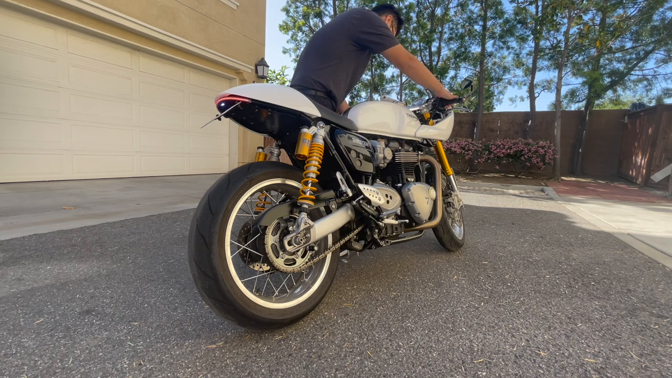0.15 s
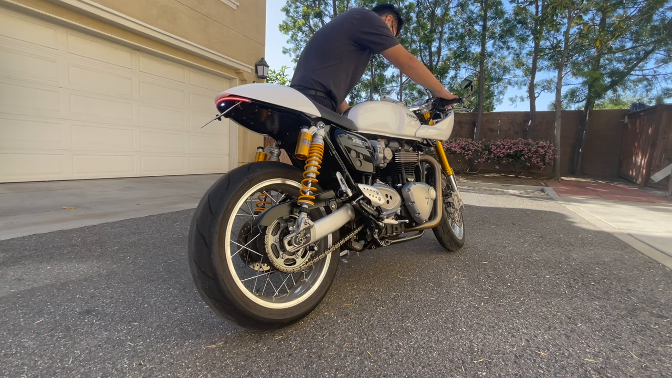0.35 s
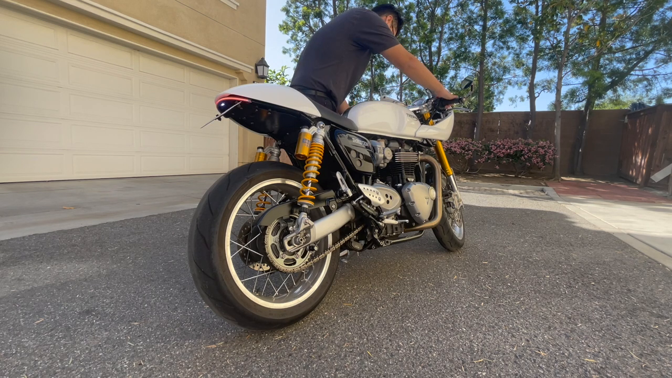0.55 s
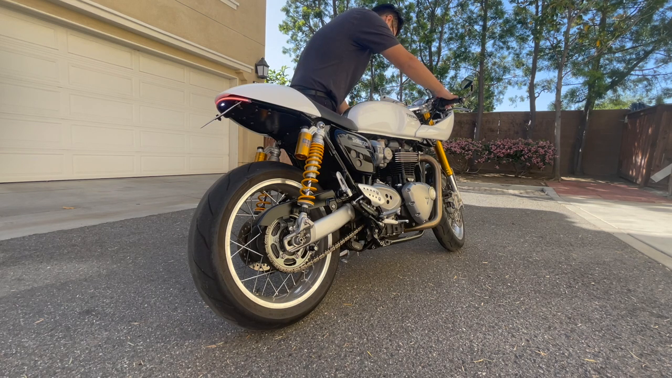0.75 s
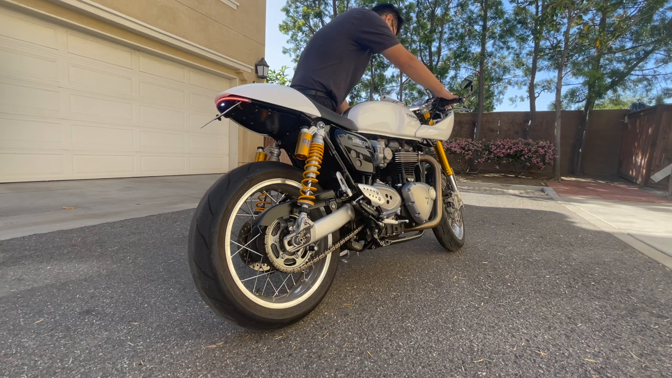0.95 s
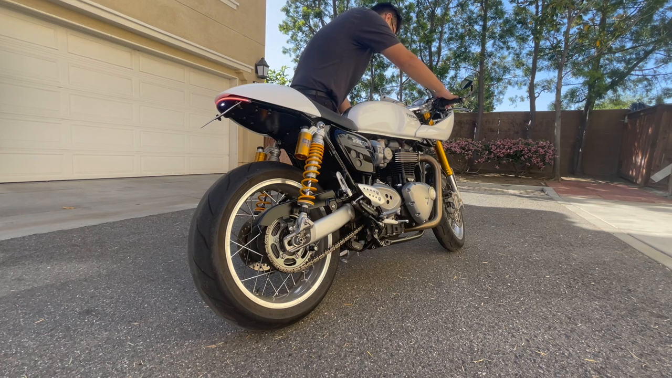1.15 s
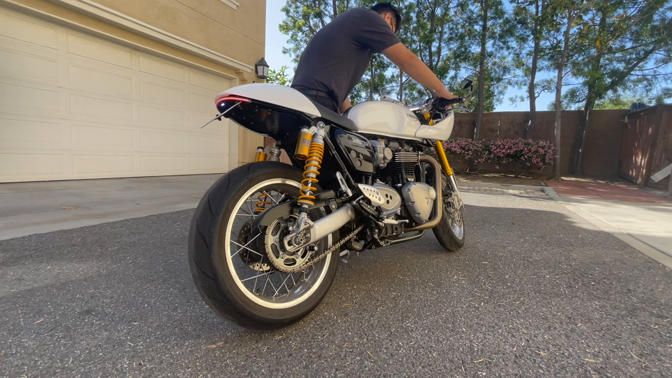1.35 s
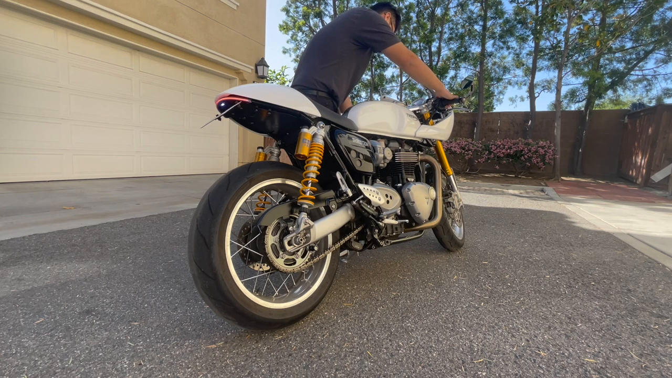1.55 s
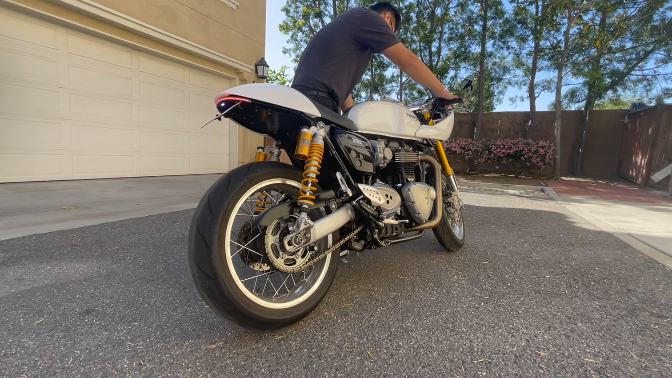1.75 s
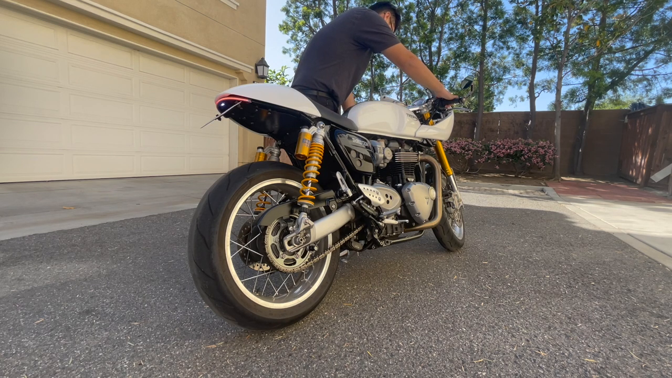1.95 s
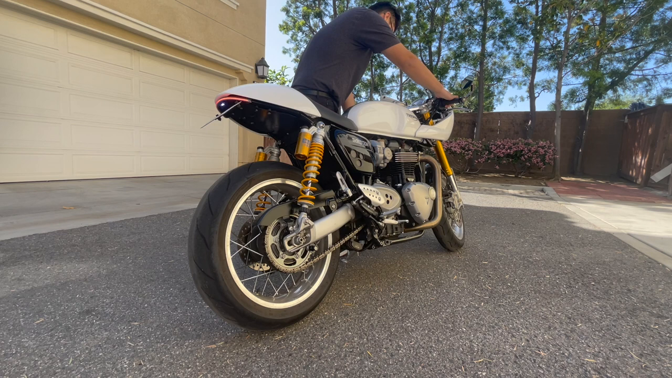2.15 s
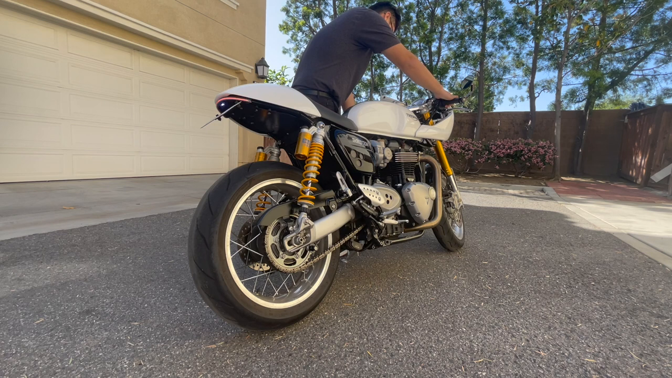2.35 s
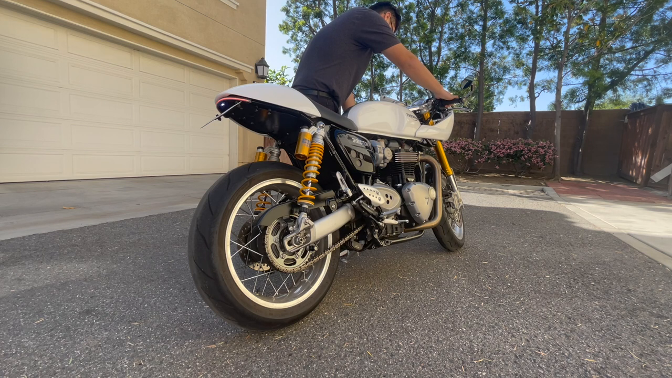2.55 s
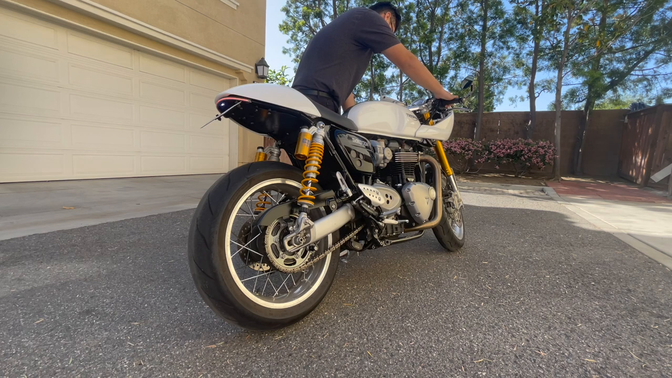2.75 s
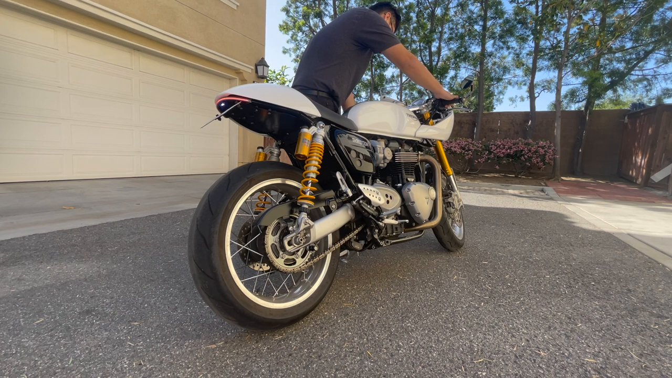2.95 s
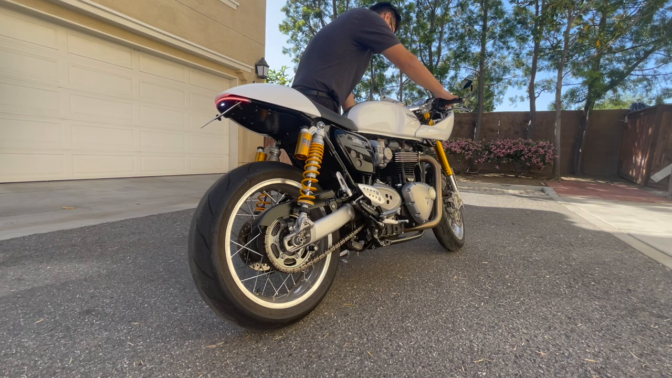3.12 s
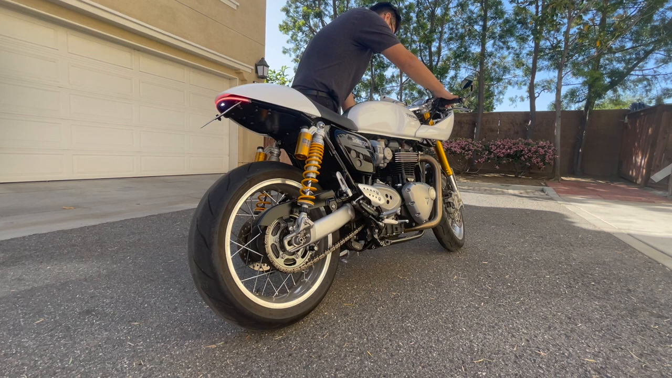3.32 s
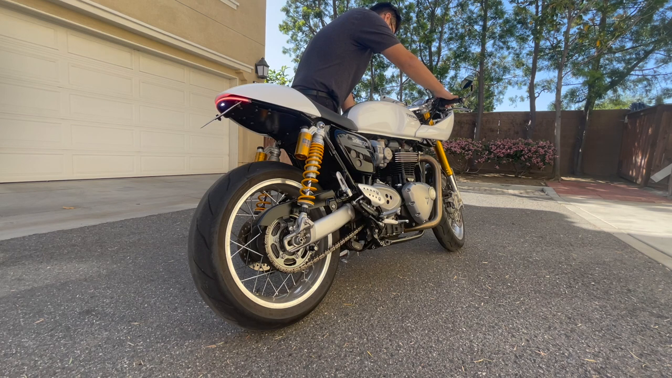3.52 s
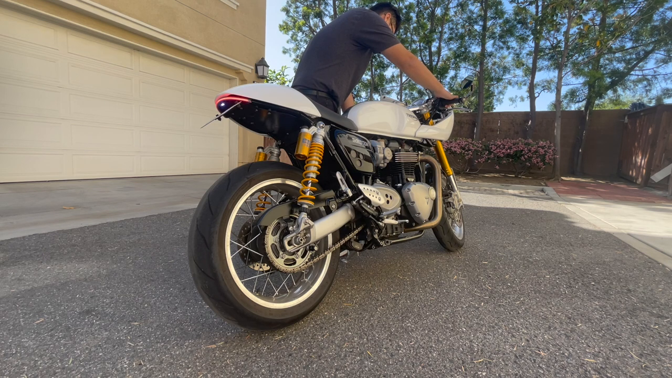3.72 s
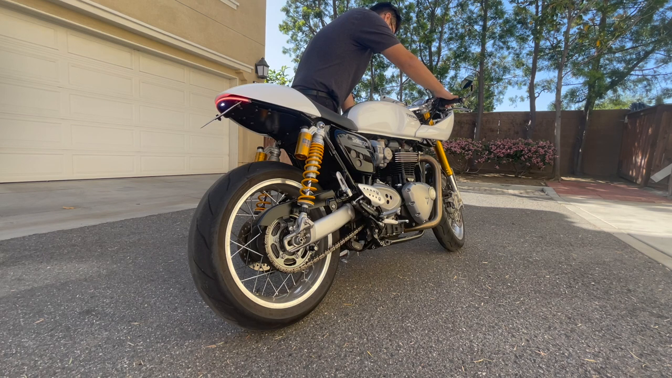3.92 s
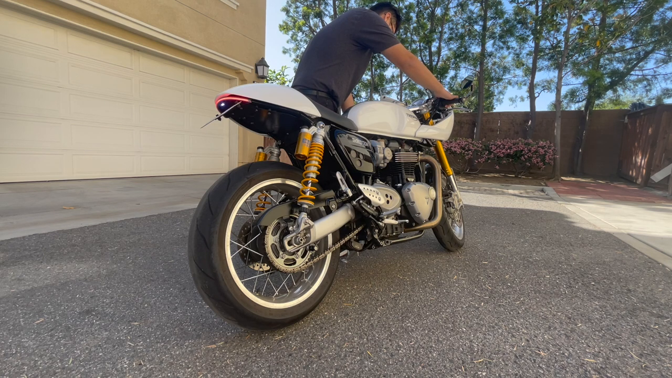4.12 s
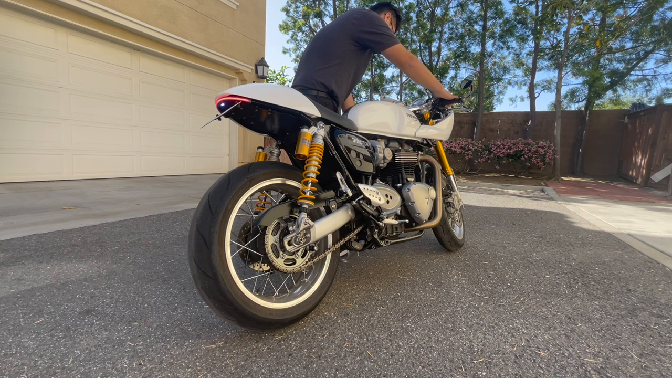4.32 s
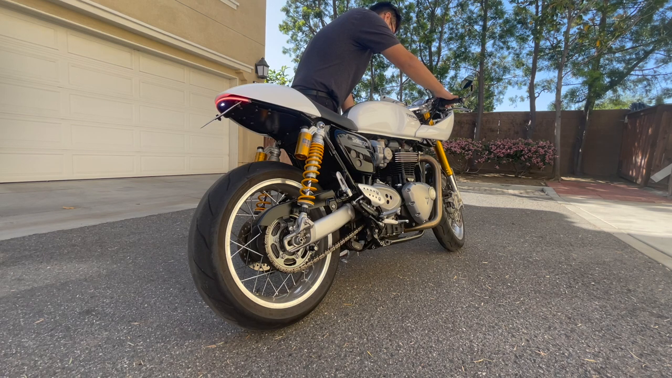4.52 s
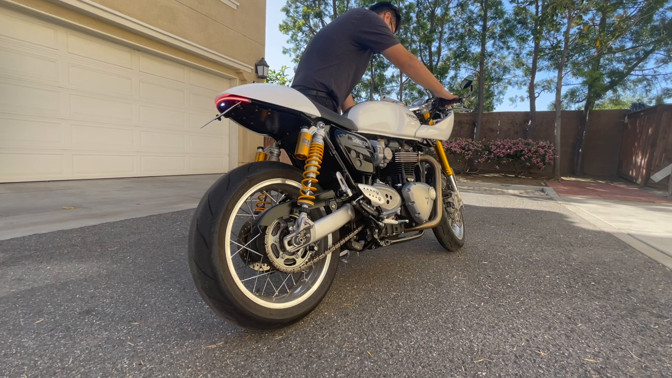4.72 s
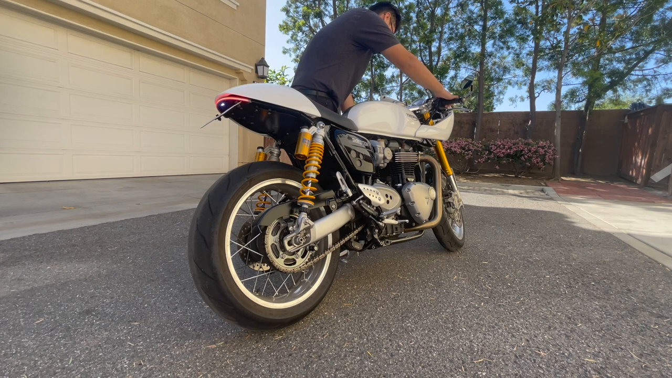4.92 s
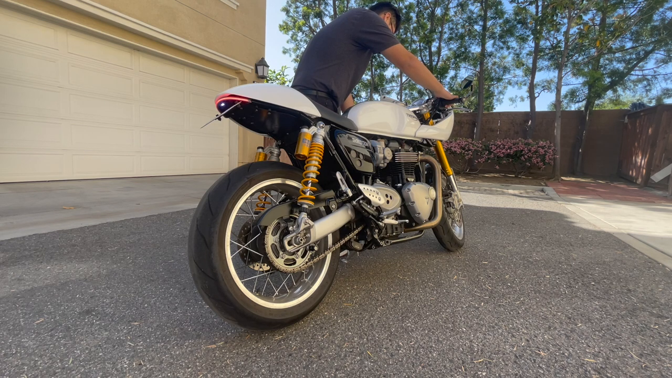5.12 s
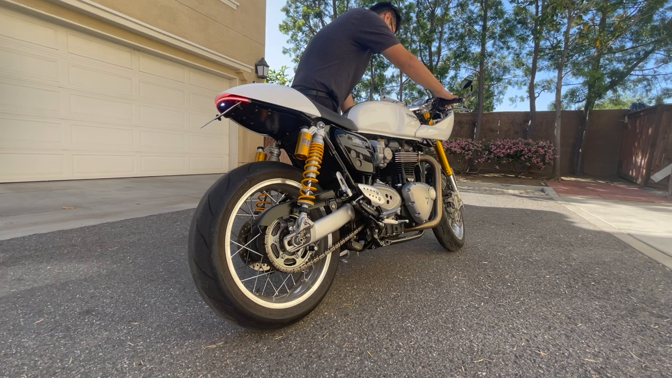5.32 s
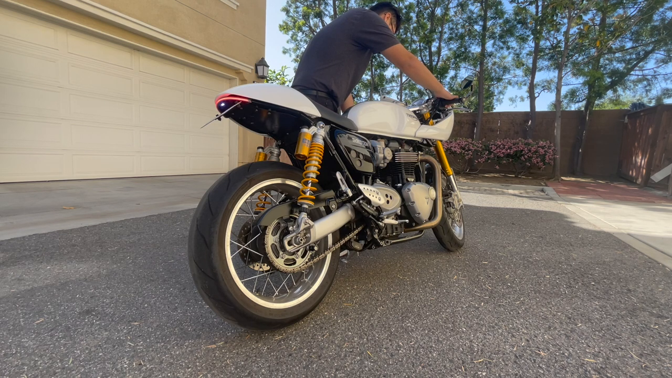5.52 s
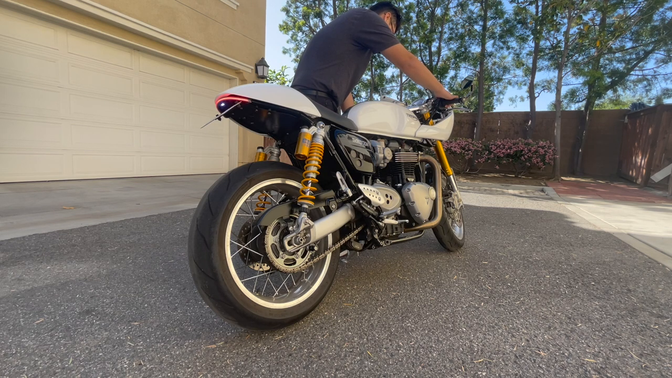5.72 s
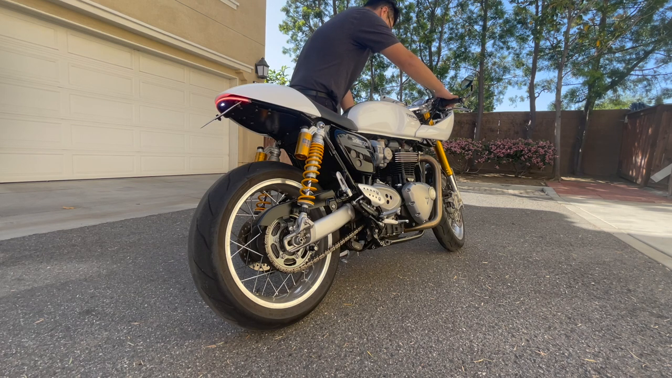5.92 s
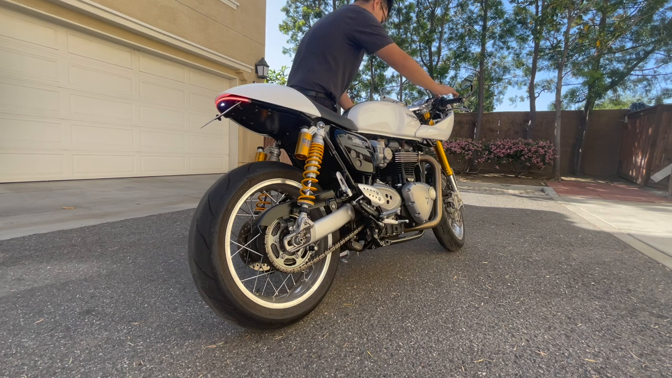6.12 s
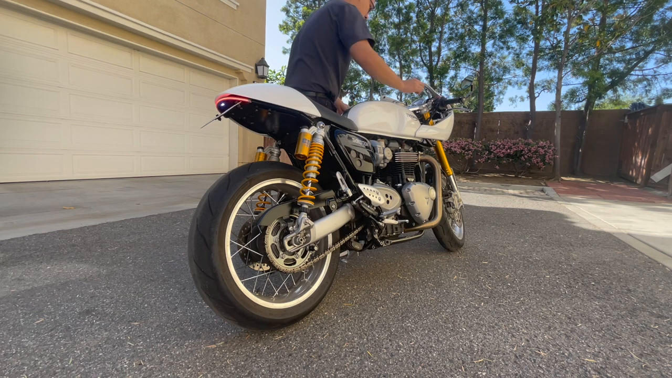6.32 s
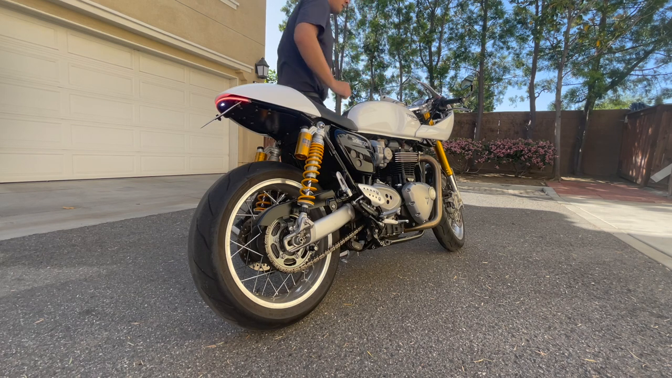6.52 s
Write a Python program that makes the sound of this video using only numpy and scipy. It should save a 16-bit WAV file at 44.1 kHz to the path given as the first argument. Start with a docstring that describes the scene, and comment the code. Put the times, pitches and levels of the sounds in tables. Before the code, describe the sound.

Outdoors in a driveway, soft distant traffic rumble and small bird chirps. A faint switch click, then a hard metallic clack and under a second of lurching, gritty starter whine with soft exhaust puffs. The twin engine catches with a thump and knocks, runs loud and rattly with small bright pings, then eases into a lumpy low idle with valve ticks. Close stereo microphone behind the bike, dull wall reflections.

```python
"""A twin-cylinder motorcycle starts beside a garage wall, with far traffic throughout.
First bird whistles over shaped noise and a switch clack; then the pinion clacks in and the starter's
gear-mesh tone and grind lurch up and sag under each compression, with soft pipe puffs.
The engine catches with a thump, pings and flares a little: firing pulses ring pipe modes, noise clatters.
It settles to an uneven-beat idle with weak firings and afterfires."""
import sys
import numpy as np
from scipy import signal
from scipy.fft import rfft, irfft
from scipy.io import wavfile

SR = 44100
rng = np.random.default_rng(int(sys.argv[2]) if len(sys.argv) > 2 else 0)


def unload_audio(sound):
    """Save the sound as a 16-bit wav file, at the path given as the first command line argument."""
    columns = np.transpose(np.atleast_2d(sound))
    # keep every value between -1 and 1, then stretch to whole-number steps
    steps = np.round(np.clip(columns, -1, 1) * 32767)
    wavfile.write(sys.argv[1], SR, steps.astype(np.int16))


N = 289737

IDLE_FROM_S = 4.0   # rms of the rasp, the ticks and the whine's speed surge is taken from here on
SECOND_CYLINDER = 0.37   # share of the two-turn cycle after the first cylinder

# Crank speed from the first firing on. Each row: time in seconds, speed in rpm.
CRANK = [(2.92, 1445.3), (3.05, 1231.3), (3.2, 1435.3), (3.5, 1470.2), (3.75, 1610.8), (4.0, 1494.3),
         (4.25, 1348.7), (4.5, 1320.7), (4.75, 1280.6), (5.0, 1221.6), (5.25, 1254.0), (5.45, 1227.6),
         (5.65, 1303.9), (5.9, 1372.1), (6.2, 1378.5), (6.57, 1368.9)]


def cycle_times(share):
    """Moments in seconds at which the crank passes a given share of each two-turn cycle."""
    t = np.arange(N) / SR
    rpm = in_time(CRANK)[0] * (t >= CRANK[0][0])
    cycles = np.cumsum(rpm) / (120 * SR)
    wanted = np.arange(share + 1e-3, cycles[-1])
    return np.interp(wanted, cycles, t)


def firing_times():
    """Nominal firing moments of both cylinders, first cylinder's block first."""
    return np.r_[cycle_times(0), cycle_times(SECOND_CYLINDER)]


# Exhaust modes. Each row: frequency in Hz, t60 in seconds, signed strength from cylinder 1, from cylinder 2.
PIPE_MODES = [(54.1, 0.55, 0.096, 0.091), (83.2, 0.2, -0.122, -0.11), (112.2, 0.21, 0.16, -0.1),
              (179.4, 0.074, 0.3, 0.49), (210.1, 0.41, -0.036, -0.14), (270.6, 0.026, -1.164, -0.31),
              (285.3, 0.21, 0.21, -0.18), (350.9, 0.096, 0.19, -0.071), (424, 0.033, 0.052, -0.057),
              (537, 0.069, -0.044, 0.15), (637, 0.042, 0.023, -0.045)]
# Lean charges that burn weakly. Each row: time in seconds, level change in dB.
STUMBLES = [(4.269, -7.5), (4.449, -7), (4.631, -1.5), (4.818, -7.5), (5.399, -5.5), (5.683, -2.5),
            (6.212, -5), (6.299, -2.5)]
# The unburnt rest lights in the pipe. Each row: time in seconds, relative level in dB.
AFTERFIRES = [(4.478, -2.5), (4.3, -8), (6.5, -11.5)]
BLOWDOWN_HZ = 536
CATCH_LATE_S = 0.004   # the first charge burns slowly


def exhaust(firing_db, boom_db, uneven_db, mode_uneven_db, jitter_s):
    """Each firing sends a blow-down pulse into the pipe modes, never twice quite alike."""
    first = cycle_times(0)
    first[0] += CATCH_LATE_S
    late_s, late_db = np.transpose(AFTERFIRES)
    second = np.r_[cycle_times(SECOND_CYLINDER)[1:], late_s]   # the second cylinder misses its first turn
    count = len(first) + len(second)
    at = np.r_[first, second] + jitter_s * rng.standard_normal(count)
    index = (at * SR).astype(int).clip(0, N - 1)

    charge_db = uneven_db * rng.standard_normal(count)
    for s, change_db in STUMBLES:
        charge_db[np.abs(at - s).argmin()] = change_db
    charge_db[-len(late_db):] = late_db

    out = 0
    for hz, t60, one, two in PIPE_MODES:
        level_db = firing_db[index] + boom_db[index] * (hz < 130)
        own_db = charge_db + mode_uneven_db * rng.standard_normal(count)
        strength = np.r_[one + 0 * first, two + 0 * second]
        pulses = clicks(at, strength * amp(level_db) * amp(own_db))
        pulses = smooth(smooth(pulses, BLOWDOWN_HZ), BLOWDOWN_HZ)
        out = out + lean(hz) * ring(pulses, hz, t60)
    return amp(20) * out


def rasp(firing_db, level_db, decay_s):
    """Turbulent gas follows each firing out of the pipe mouth and rings three modes."""
    first, second = cycle_times(0), cycle_times(SECOND_CYLINDER)
    sizes = np.r_[0.6 + 0 * first, 1 + 0 * second]
    gate = smooth(clicks(np.r_[first, second] + 0.0044, sizes), 1 / (2 * np.pi * decay_s))
    noise = rng.standard_normal((2, N)) * gate
    sound = resonance(noise, 530, 70) + amp(-2) * resonance(noise, 400, 110) + resonance(noise, 307, 69)
    return amp(firing_db + level_db) * rms_one(sound, IDLE_FROM_S) * lean(300)


def tick_spread(uneven_db, count):
    """Chance force of each tick in dB, uniform."""
    return uneven_db * rng.uniform(-1.7, 1.7, count)


# Valve ticks in one cycle. Each row: share of the cycle, level in dB.
VALVES = [(1, 8.5), (0.334, 11), (0.532, -1), (0.692, 1)]
STRAY_TICKS_PER_S, STRAY_TICK_DB = 14, -5   # loose parts tick at no set angle


def tick_gate(tick_s, uneven_db):
    """Decaying envelope of valve ticks at set crank angles and of stray ticks, with varying force."""
    stray = rng.random(N) < STRAY_TICKS_PER_S / SR
    running = np.arange(N) / SR > CRANK[0][0]
    ticks = stray * running * amp(STRAY_TICK_DB + tick_spread(uneven_db, N))
    for share, db in VALVES:
        at = cycle_times(share)
        late_s = 0.00063 * rng.standard_normal(len(at))
        ticks = ticks + clicks(at + late_s, amp(db + tick_spread(uneven_db, len(at))))
    return smooth(smooth(ticks, 1 / (2 * np.pi * tick_s)), 170)


# Rustle spectrum shape. Each row: frequency in Hz, relative level in dB per Hz.
RUSTLE_SPECTRUM = [(410, -1.5), (700, 1.5), (1520, 3), (1840, -1.5), (2160, -0.5), (2820, -5.5),
                   (7510, -15.5), (7970, -28), (8890, -8), (10000, -26), (11200, -6.5), (12600, -64),
                   (16400, -56), (22000, -120)]
# Tick spectrum shape. Each row: frequency in Hz, relative level in dB per Hz.
TICK_SPECTRUM = [(500, -6), (1300, -2), (2400, 1.5), (4500, 7.5), (7500, -1.5), (9000, 1), (11500, 13.5),
                 (14000, -7)]
# Engine cases ringing. Each row: frequency in Hz, width in Hz, relative level in dB.
CASES = [(1153, 320, 13), (1488, 19, 19), (2080, 72, -16), (2540, 47, -19), (4060, 370, -27), (7200, 22, 7)]
RATTLE_DB, WHINE_DB = -6.5, -13   # against the unit-rms rustle noise before its flutter


def clatter(level_db, tick_db, tick_s, uneven_db):
    """Chains and gears rattle in the cases as noise and random grains; valve ticks gate noise."""
    gate = tick_gate(tick_s, uneven_db)
    grains = (rng.random((2, N)) < 1400 / SR) * rng.standard_normal((2, N))
    grains = grains * (amp(3 * drift(40)) + 0.8 * rms_one(smooth(gate, 120)))
    rung = sum(amp(db + 2.0 * drift(5.3)) * resonance(grains + 1e-18, hz, width) for hz, width, db in CASES)
    rustle = rms_one(coloured(RUSTLE_SPECTRUM)) * amp(1.63 * drift(41) + 0.87 * drift(17))
    steady = rustle + amp(RATTLE_DB) * rms_one(ports(*rung)) + amp(WHINE_DB) * whine()
    running = smooth(np.arange(N) / SR > CRANK[0][0], 4.2)
    ticking = rms_one(coloured(TICK_SPECTRUM) * gate, IDLE_FROM_S)
    return amp(level_db) * (running * steady + amp(tick_db) * ticking)


# The gears sing where the crank loads them. Each row: share of the cycle, level in dB.
WHINE_LOADS = [(.3, 3.5), (.68, 2), (.92, 5)]
WHINE_PER_TURN = 102.5   # gear teeth meeting per crank turn
SPEED_WOBBLE, WHINE_SWELL_HZ = 0.016, 37   # wobble: share of speed per unit of the wobble signal


def whine():
    """Gears sing at a multiple of crank speed, surging after firings; rough, swelling at set crank angles."""
    surge = smooth(smooth(clicks(firing_times(), 1), 12.7), 12.7)
    wobble = rms_one(surge - smooth(surge, 2.93), IDLE_FROM_S) + 0.584 * drift(46.2)
    hz = WHINE_PER_TURN * in_time(CRANK)[0] / 60 * (1 + SPEED_WOBBLE * wobble)
    loads = 0
    for share, db in WHINE_LOADS:
        at = cycle_times(share) - 0.006
        loads = loads + clicks(at, amp(db + 1.1 * rng.standard_normal(len(at))))
    swell = smooth(smooth(loads, WHINE_SWELL_HZ), WHINE_SWELL_HZ)
    roughness = 0.75 + drift(200)
    tone = np.sin(2 * np.pi * np.cumsum(hz) / SR) * roughness
    return rms_one(ports(tone, np.roll(tone, SR // 9)) * swell)


# Bright pings while the engine settles. Each row: time in seconds, peak in dB before the stereo lean.
PINGS = [(3.1268, -29), (3.2438, -31), (3.2969, -24.5), (3.3243, -28), (3.3792, -27), (3.4085, -28),
         (3.6479, -28), (3.6975, -24), (3.7738, -23), (3.9265, -30)]
PING_HZ, PING_T60_S = 2115, 0.027
CATCH_HZ, CATCH_T60_S, CATCH_DB = 158.5, 0.16, -6   # level before softening


def pings():
    """The first charge to light thumps in the cold pipe, then pings: single decaying modes."""
    s, db = np.transpose(PINGS)
    thump = ring(clicks([CRANK[0][0] + 0.00614], amp(CATCH_DB)), CATCH_HZ, CATCH_T60_S)
    bright = ring(clicks(s, amp(db)), PING_HZ, PING_T60_S)
    return lean(PING_HZ) * bright + lean(CATCH_HZ) * smooth(thump, 416)


# Spin-up in lurches, singing when the teeth bite. Each row: time in seconds, gear mesh in Hz, level in dB,
# relative treble in dB, strength of the clean tone against the grind.
SPIN_UP = [(2.191, 417, -31.5, -5, .15), (2.214, 600, -30, -11, .2), (2.226, 632, -27, -11, .6),
           (2.237, 660, -28.5, -3, .2), (2.246, 860, -27.5, -4, .4), (2.258, 900, -26, -6, .4),
           (2.273, 1074, -28, -1.5, .6), (2.286, 1085, -28, 1, .5), (2.29, 1090, -29.5, -8.5, .1),
           (2.302, 1260, -29.5, -6, .1), (2.313, 1294, -28.5, -3.5, .3), (2.337, 1387, -26.5, -1.5, .35),
           (2.362, 1400, -29, 5, .4)]
# Teeth loading up against a compression. Each row: start in seconds, length in seconds, level in dB,
# relative treble at the bite in dB, mesh from Hz, mesh to Hz.
LOADS = [(2.372, 0.031, -22.5, 1, 1357, 1037), (2.508, 0.032, -25, 8.5, 1533, 1260),
         (2.611, 0.038, -26, 7, 1517, 1417), (2.728, .034, -22.5, 2, 1580, 1170),
         (2.862, 0.027, -25, 6, 1548, 1286)]
ATTACK_S, SWELL_S, RELEASE_S = 0.012, 0.0077, 0.018
BITE_DB, HOLD_DB = -3, -8.5   # at the bite and at the end of the hold, rel the row
HOLD_TREBLE_DB, END_TREBLE_DB, COAST_TREBLE_DB = -2.5, 7, -4.5
RELEASED_DB, COAST_DB = -33, -36   # just after a load and just before the next
LOAD_TONE, COAST_TONE = 0.75, 0.15   # clean tooth tone against the grind
SAG_HZ_PER_S, DWELL_S = 13500, 0.034   # the mesh slows under load and stays slow a while after the release
LET_GO_S, LET_GO_HZ, LET_GO_DB = 3.03, 1234, -37.5   # the pinion drops out


def starter_controls():
    """Mesh rate, level, treble and tone: spin-up, then bite, swell, hold, release and coast per load."""
    mesh = [(s, hz) for s, hz, *_ in SPIN_UP]
    shape = []
    for s, length, db, bite_db, from_hz, to_hz in LOADS:
        end = s + length
        mesh += [(s, from_hz),
                 (s + (from_hz - to_hz) / SAG_HZ_PER_S, to_hz),
                 (end + RELEASE_S + DWELL_S, to_hz)]
        shape += [(s - ATTACK_S, COAST_DB, COAST_TREBLE_DB, COAST_TONE),
                  (s, db + BITE_DB, bite_db, LOAD_TONE),
                  (s + SWELL_S, db, HOLD_TREBLE_DB, LOAD_TONE),
                  (end, db + HOLD_DB, END_TREBLE_DB, LOAD_TONE),
                  (end + RELEASE_S, RELEASED_DB, COAST_TREBLE_DB, COAST_TONE)]
    mesh += [(LET_GO_S, LET_GO_HZ)]
    spin = [(s, *rest) for s, _, *rest in SPIN_UP]
    shape = spin + shape[1:]   # no coast before the first load
    shape += [(LET_GO_S, LET_GO_DB, COAST_TREBLE_DB, COAST_TONE)]
    return in_time(mesh) + in_time(shape)


# Harmonics 1 to 8 of the gear mesh. One column: level in dB before flicker.
TOOTH_DB = [-2, -1, 0, -1, -1, -3, -3, -4]
# The casing lets the tooth tone out unevenly. Each row: frequency in Hz, gain in dB.
TEETH_HEARD = [(600, -16), (1000, -7), (1250, 0), (2750, 0), (3200, -7), (4300, -10), (5200, -5), (5900, 0),
               (12000, 0)]
# Starter housing modes. Each row: frequency in Hz, width in Hz before 60 Hz is added, relative level in dB.
HOUSING = [(1236, 190, -14), (1490, 27, 6.5), (1870, 38, -3), (2084, 51, 8), (2680, 15, 2.5),
           (5654, 26, 12), (5870, 490, 5), (6364, 50, 12.5), (6490, 120, 9), (7330, 25, 14.5),
           (7360, 170, 9.5), (8300, 230, -14), (9100, 850, -2), (8400, 22, 3), (11170, 29, 11)]
# Grind spectrum shape. Each row: frequency in Hz, relative level in dB per Hz.
GRIND = [(210, -13), (350, -13), (520, -5.5), (811, -6), (1050, 1), (1640, 1.5), (2650, -12), (3300, -2.5),
         (4200, -5.5), (5290, 0.5), (5900, -14.5), (7470, 5.5), (12600, -3.5), (16400, -56), (22000, -120)]
TREBLE_FROM_HZ = 3700


def starter():
    """Gear teeth strike at the mesh rate, which sags under each compression; the housing rings."""
    mesh_hz, level_db, treble_db, tone = starter_controls()
    phase = 2 * np.pi * np.cumsum(mesh_hz * (1 + 0.011 * drift(150))) / SR
    harmonics = sum(np.cos(k * phase) * amp(db + 5.5 * drift(50)) for k, db in enumerate(TOOTH_DB, 1))
    teeth = np.clip(tone, 0, 2) * harmonics
    growl = 1 + 0.078 * np.cos(phase / 9)   # once a turn of the nine-tooth pinion
    grit = rms_one(rng.standard_normal((2, N)) * amp(1.6 * drift(160)))
    drive = (shaped(teeth, TEETH_HEARD) + 1.8 * grit) * growl

    rung = 0
    for k, (hz, width, db) in enumerate(HOUSING):
        rung = rung + amp(db) * (-1) ** k * resonance(drive, hz, width + 60)
    sound = ports(*(rms_one(rung) + rms_one(shaped(drive, GRIND))))
    low = signal.sosfilt(signal.butter(4, TREBLE_FROM_HZ, fs=SR, output="sos"), sound)
    high = signal.sosfilt(signal.butter(4, TREBLE_FROM_HZ, "high", fs=SR, output="sos"), sound)
    t = np.arange(N) / SR
    on = smooth((t > SPIN_UP[0][0]) & (t < LET_GO_S), 44)
    return on * amp(level_db) * (rms_one(low) + amp(treble_db) * rms_one(high))


# Unfired compressions. Each row: time in seconds, strength in dB, upper modes' relative strength in dB.
PUFFS = [(2.325, -30.5, 15), (2.371, -23, -2), (2.485, -13.5, 2.5), (2.568, -21.5, -8), (2.629, -18, -18),
         (2.703, -19, 6), (2.724, -23.5, 5), (2.84, -14, 0.5), (2.903, -21, -5)]
# The longest pipe and airbox modes. Each row: frequency in Hz, t60 in seconds, level in dB.
UNFIRED_MODES = [(56.2, 0.26, -1), (89, 0.026, 8), (165, 0.25, -6), (270, 0.07, -12)]
CRANKING_PUFF_HZ, SIGH_DB = 113, -16.5


def cranking():
    """Soft puffs of unburnt charge ring the pipe, with air sighing through it after them."""
    puff_s, puff_db, upper_db = np.transpose(PUFFS)
    low = smooth(smooth(clicks(puff_s, amp(puff_db)), CRANKING_PUFF_HZ), CRANKING_PUFF_HZ)
    upper = smooth(smooth(clicks(puff_s, amp(puff_db + upper_db)), CRANKING_PUFF_HZ), CRANKING_PUFF_HZ)
    flow = smooth(clicks(puff_s, amp(puff_db)), 2.8)
    sigh = amp(SIGH_DB) * rng.standard_normal(N) * flow * np.sqrt(SR)
    out = 0
    for hz, t60, db in UNFIRED_MODES:
        puff = upper if hz > 130 else low
        out = out + amp(db) * lean(hz) * ring(puff + sigh, hz, t60)
    return out


# Switch, pinion in, pinion out, a stray knock. Each row: time in seconds, level in dB, centre in Hz,
# dull above Hz.
CLACKS = [(1.352, -30.5, 2230, 3000), (2.1807, -10, 5600, 13700), (2.9246, -16, 1303, 6050),
          (3.007, -11, 1290, 7000), (3.041, -8, 1230, 9200), (5.689, -12, 1190, 3000)]
CLACK_S = 0.007


def clacks():
    """Short knocks of metal parts: decaying noise bursts through a broad resonance."""
    out = np.zeros((2, N))
    for s, db, hz, dull_hz in CLACKS:
        burst = rng.standard_normal(N) * smooth(clicks([s], SR * CLACK_S), 1 / (2 * np.pi * CLACK_S))
        knock = 0.13 * burst + 0.36 * resonance(burst, hz, 1.1 * hz)
        out += amp(db) * lean(hz) * smooth(smooth(knock, dull_hz), dull_hz)
    return out


# Wall and ground. Each row: delay in seconds, gain left, gain right.
ECHOES = [(.0305, 0.23, 0.23), (0.00384, 0.13, -0.0035), (.019, -0.043, 0.26), (0.01978, 0.13, -0.2)]
ECHO_CUT_HZ = 2500


def echoes(bike):
    """Wall and ground return delayed, dulled copies of the machine."""
    out, dull = np.zeros((2, N)), smooth(bike.mean(0), ECHO_CUT_HZ)
    for delay, left, right in ECHOES:
        lag = int(delay * SR)
        out[:, lag:] += np.array([[left], [right]]) * dull[:-lag]
    return out


# Bird notes. Each row: start in seconds, length in seconds, from Hz, to Hz, level in dB.
BIRDS = [(0.1, 0.028, 4140, 4050, -63), (0.101, .012, 4830, 4800, -63), (0.125, .02, 3700, 3280, -70),
         (.135, 0.011, 4130, 4100, -63), (0.152, .008, 4840, 4770, -66), (.155, 0.018, 3150, 2960, -64),
         (.195, .012, 5200, 5130, -62), (0.211, 0.02, 4600, 4480, -61), (0.253, 0.016, 4260, 4150, -61),
         (0.235, 0.025, 3840, 3600, -61), (0.273, 0.033, 3570, 3360, -59), (0.3, 0.013, 3060, 2710, -59),
         (0.327, 0.024, 3580, 3270, -62), (.855, .03, 4800, 5830, -67), (0.884, 0.024, 4550, 4500, -61),
         (0.907, .014, 4380, 3480, -63), (.96, 0.029, 2400, 2870, -71), (0.944, 0.03, 4730, 5350, -55.5),
         (0.952, .02, 4700, 3560, -64), (0.974, 0.012, 5600, 7100, -58), (0.994, 0.017, 6140, 4750, -60),
         (1.015, 0.04, 4250, 4200, -62), (1.036, 0.018, 3680, 3500, -66), (1.076, .018, 2890, 2970, -61),
         (1.379, 0.02, 5080, 5180, -54), (1.392, 0.019, 4860, 4670, -53), (1.414, 0.025, 3820, 3830, -54.5),
         (1.449, 0.031, 3530, 3440, -56), (1.449, .014, 4200, 4300, -58), (1.484, 0.019, 3220, 2500, -61),
         (1.51, 0.056, 3810, 2930, -64), (1.758, 0.086, 3260, 3260, -71), (1.84, 0.084, 3230, 3160, -73),
         (1.917, 0.059, 4300, 4350, -62.5), (1.975, 0.032, 5000, 5630, -66),
         (2.015, 0.023, 4890, 4590, -45.5), (2.043, 0.009, 3740, 3730, -58), (2.056, .012, 4750, 4700, -61),
         (2.088, .008, 4440, 4220, -57), (2.1, 0.016, 2620, 2920, -63), (2.128, .012, 3500, 2830, -65),
         (2.069, 0.032, 4750, 5800, -58), (2.112, 0.0085, 3400, 4000, -49.5)]
FAINT_PER_NOTE = 4
CHATTER_S, CHATTER_HZ, CHATTER_DB = 0.035, 500, -71   # time spread, pitch spread, mean level of faint notes
BLUR_T60_S, BLUR_DB = 0.4, 0


def birds():
    """Gliding, slightly warbled whistles; fainter birds chime in around them; houses and trees blur all."""
    dry, rows = np.zeros(N), np.array(BIRDS)
    faint = np.repeat(rows, FAINT_PER_NOTE, axis=0)
    # short notes near 1.08 times the loud note's mean pitch
    faint = faint * [1, 0.0099, 0.5, 0.58, 0] + [0, 0.014, 0, 0, CHATTER_DB]
    faint[:, 2:4] = faint[:, 2:4].sum(axis=1, keepdims=True)
    chance = rng.standard_normal((len(faint), 4))
    faint += chance[:, [0, 0, 1, 2, 3]] * [CHATTER_S, 0, CHATTER_HZ, CHATTER_HZ, 3]

    warble, trill = 1 + 0.011 * drift(200), amp(2.2 * drift(120))
    for s, length, hz0, hz1, db in np.vstack([rows, faint]):
        u, start = np.linspace(0, 1, int(length * SR)), int(abs(s) * SR)
        span = slice(start, start + len(u))
        hz = (hz0 + (hz1 - hz0) * u) * warble[span]
        envelope = np.abs(np.sin(np.pi * u)) ** 0.2
        dry[span] += amp(db) * np.sin(2 * np.pi * np.cumsum(hz) / SR) * envelope
    dry = dry * trill
    t = np.arange(SR // 3) / SR
    tails = rms_one(rng.standard_normal((2, len(t))) * amp(-60 * t / BLUR_T60_S)) / np.sqrt(len(t))
    return dry + amp(BLUR_DB) * signal.fftconvolve(dry[None], tails, axes=1)[:, :N]


# Outdoor air spectrum shape. Each row: frequency in Hz, relative level in dB per Hz.
AIR = [(15, -40), (25, -9.5), (66, -1.5), (121, -5), (391, -22), (840, -21), (1850, -36.5), (4400, -37.5),
       (4870, -32), (6780, -48), (7700, -37), (8530, -55), (11000, -45.5), (14300, -100), (22000, -120)]
# Steady narrow hisses. Each row: frequency in Hz, width in Hz, level in dB.
HISSES = [(2020, 37, -79.5), (4800, 180, -87), (5840, 200, -74.5), (7560, 69, -71)]
AIR_DB = -49.5


def outdoors():
    """Far traffic rumble and wind in leaves as shaped noise, with a few narrow steady hisses."""
    gusts = amp(1.8 * drift(3))
    air = amp(AIR_DB) * gusts * rms_one(coloured(AIR))
    air[1] = np.roll(air[1], 21)   # the rumble reaches the left port first
    noise = rng.standard_normal((2, N))
    for hz, width, db in HISSES:
        air = air + amp(db) * rms_one(resonance(resonance(noise, hz, width), hz, width))
    return air


def amp(db):
    """Gain of a level in dB."""
    return 10 ** (np.asarray(db) / 20)


def rms_one(x, s0=0., s1=99.):
    """Scale to unit rms over a stretch of time in seconds."""
    return x / np.sqrt(np.mean(x[..., int(s0 * SR):int(s1 * SR)] ** 2) + 1e-20)


def in_time(rows):
    """Columns of a curve table, one value a sample."""
    s, *columns = np.transpose(rows)
    return [np.interp(np.arange(N) / SR, s, c) for c in columns]


def at_hz(points, hz):
    """A spectrum table read on a log-frequency axis."""
    table = np.array(points)
    return np.interp(np.log(hz), np.log(table[:, 0]), table[:, 1])


def clicks(times, sizes):
    """Single-sample impulses."""
    out = np.full(N, 1e-18)
    index = np.round(np.asarray(times) * SR).astype(int)
    np.add.at(out, np.clip(index, 0, N - 1), sizes)
    return out


def smooth(x, hz):
    """One-pole low-pass."""
    r = np.exp(-2 * np.pi * hz / SR)
    return signal.lfilter([1 - r], [1, -r], x)


def drift(hz):
    """Slow chance of spread 1: low-passed noise."""
    return rms_one(smooth(smooth(rng.standard_normal(N + SR), hz), hz)[SR:])


def ring(x, hz, t60):
    """A unit click sets a decaying sine of height 1 ringing."""
    r, w = amp(-60 / (max(t60, 0.002) * SR)), 2 * np.pi * hz / SR
    return signal.lfilter([0, np.sin(w)], [1, -2 * r * np.cos(w), r * r], x)


def resonance(x, hz, width_hz):
    """Band-pass of gain 1 on top."""
    r = np.exp(-np.pi * width_hz / SR)
    zeros = np.array([1, 0, -1]) * (1 - r * r) / 2
    return signal.lfilter(zeros, [1, -2 * r * np.cos(2 * np.pi * hz / SR), r * r], x)


def shaped(x, spectrum):
    """Colour a sound by a spectrum table."""
    hz = np.maximum(np.fft.rfftfreq(N, 1 / SR), 1)
    return irfft(rfft(x) * amp(at_hz(spectrum, hz)), N)


def coloured(spectrum):
    """Stereo noise of a given spectrum."""
    return ports(*shaped(rng.standard_normal((2, N)), spectrum))


# Stereo balance. Each row: frequency in Hz, left minus right in dB.
LEAN = [(60, 1), (110, 3.5), (200, 0), (350, 6), (640, 2), (1150, 5), (2070, 2), (3740, 4.5), (6750, 6),
        (12200, -1)]


def lean(hz):
    """Left and right gains at a frequency."""
    return amp(at_hz(LEAN, hz) * np.array([[0.5], [-0.5]]))


# Likeness of the ports. Each row: frequency in Hz, shared share of power.
LIKENESS = [(60, .99), (130, 1), (270, 1), (580, 0.29), (1250, 0.068), (2670, 0.19), (5700, 0.11),
            (12200, 0.12)]
# Phase between the ports. Each row: frequency in Hz, radians by which the left port leads.
LEAD = [(0, 0), (690, 0.2), (1550, 0.6), (2670, 0.5), (3190, 1.5), (4390, -0.7), (5430, -2.5), (6290, 0.5),
        (7320, 0), (7670, 1.5), (8610, -8.5), (9650, -8), (10400, -8.5), (12300, -10.5)]


def ports(near, apart):
    """Two microphone ports: a shared sound shifted in phase between them, plus an unshared part."""
    hz = np.maximum(np.fft.rfftfreq(N, 1 / SR), 1)
    alike = np.sqrt(np.clip(at_hz(LIKENESS, hz), 0, 1))
    left, other = rfft(near), rfft(apart)
    right = np.exp(-1j * at_hz(LEAD, hz)) * (alike * left + np.sqrt(1 - alike ** 2) * other)
    return irfft(lean(hz) * [left, right], N)


# Engine running. Each row: time in seconds, exhaust level in dB, boom below 130 Hz in relative dB.
RUNNING = [(2.92, -23, 7.5), (3.0, -15, 0.5), (3.3, -15.5, -1.5), (3.9, -14.5, -2.5), (4.05, -20, 3),
           (4.6, -19, 0), (5.15, -19.5, 3), (5.5, -20.5, 2.5), (5.9, -18, -2), (6.3, -18, 0.5)]
# Mechanical noise fades as oil pressure builds. Each row: time in seconds, level in dB.
OILING = [(2.92, -31.5), (3.05, -31), (3.5, -34.5), (4.5, -38.5), (5.4, -40), (6.3, -38.5)]
SILENCER_HZ = 572


def scene():
    """The machine with its dull echoes, over the outdoor sounds."""
    firing_db, boom_db = in_time(RUNNING)
    pipe = exhaust(firing_db, boom_db, uneven_db=0.7, mode_uneven_db=2, jitter_s=0.0003)
    pipe = pipe + rasp(firing_db, level_db=-8, decay_s=0.037)
    pipe = signal.sosfilt(signal.butter(4, SILENCER_HZ, fs=SR, output="sos"), pipe)
    gear = clatter(*in_time(OILING), tick_db=-7, tick_s=0.004, uneven_db=3.6)
    bike = pipe + gear + pings() + starter() + cranking() + clacks()
    return bike + echoes(bike) + birds() + outdoors()


LIMIT_DB, RELEASE_DB_PER_S = -4, 150


def limited(x):
    """Gain control: drops just ahead of peaks over the limit, recovers at a steady rate."""
    ramp = RELEASE_DB_PER_S * np.arange(N) / SR
    over = np.maximum(20 * np.log10(np.abs(x).max(0) + 1e-9) - LIMIT_DB, 0)
    held = np.maximum.accumulate(over + ramp) - ramp
    ahead = np.r_[held[66:], np.full(66, held[-1])]   # 66 samples early
    return x * amp(-smooth(ahead, 150))


CUTOFF_HZ = 13100


def record(dry):
    """Deep bass is dropped and a band near 10 kHz is thinned; peaks are limited, the top is cut."""
    x = signal.sosfilt(signal.butter(2, 35, "high", fs=SR, output="sos"), dry)
    x = signal.sosfilt(signal.butter(2, [9600, 10600], "bandstop", fs=SR, output="sos"), x)
    x = limited(x)
    return signal.sosfilt(signal.cheby2(12, 50, CUTOFF_HZ, fs=SR, output="sos"), x)


dry = scene()
out = record(dry)
unload_audio(out)
```